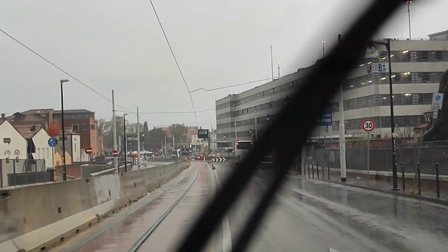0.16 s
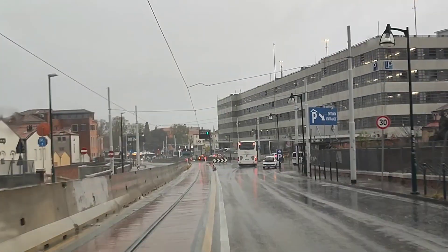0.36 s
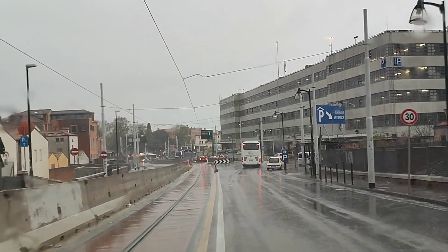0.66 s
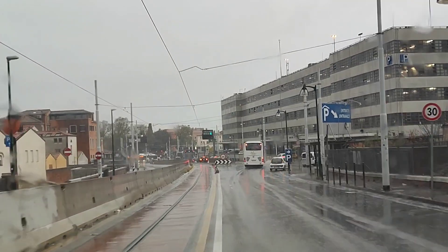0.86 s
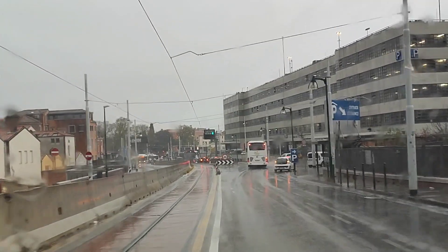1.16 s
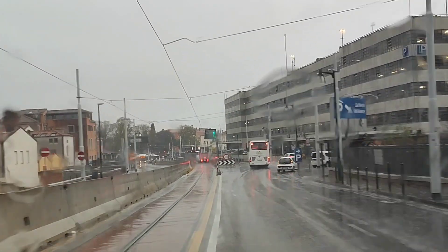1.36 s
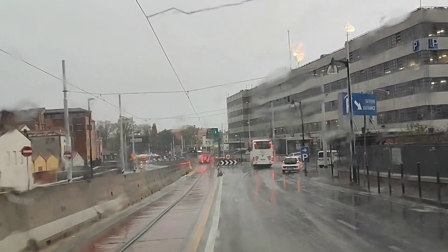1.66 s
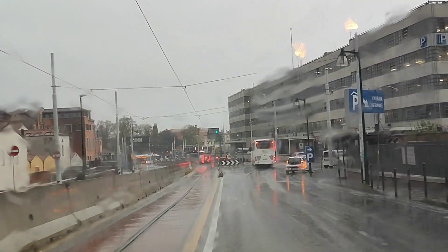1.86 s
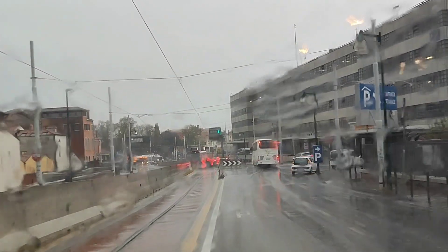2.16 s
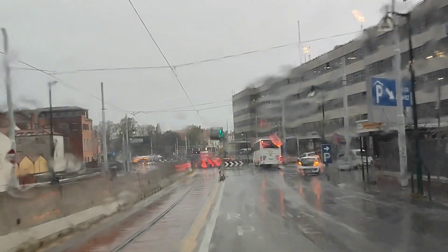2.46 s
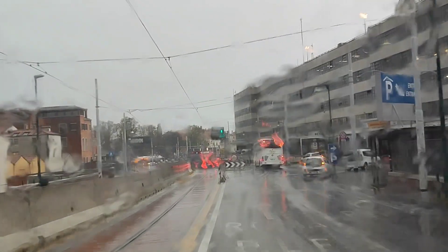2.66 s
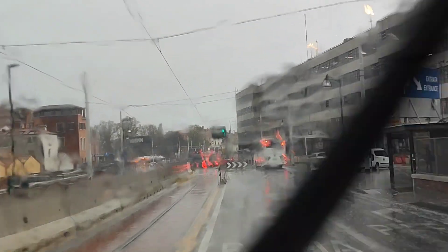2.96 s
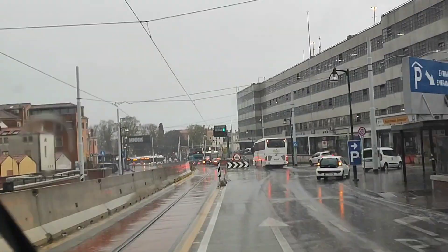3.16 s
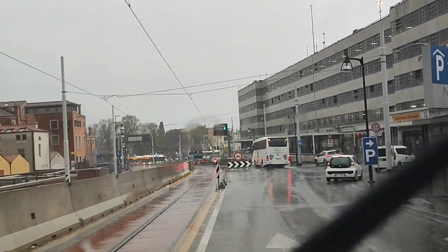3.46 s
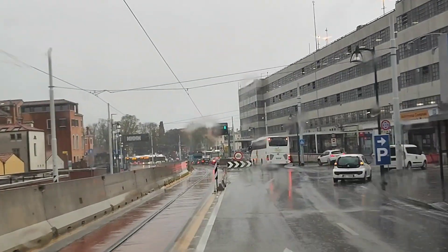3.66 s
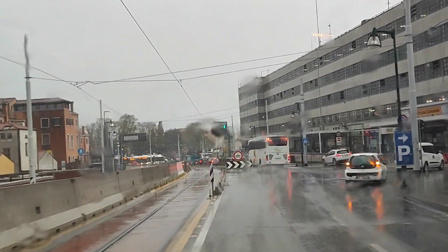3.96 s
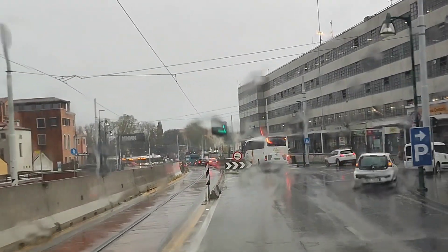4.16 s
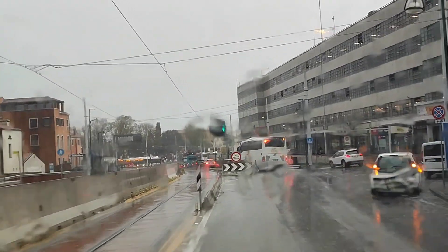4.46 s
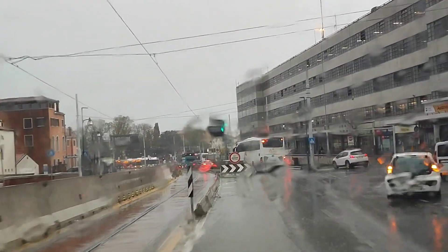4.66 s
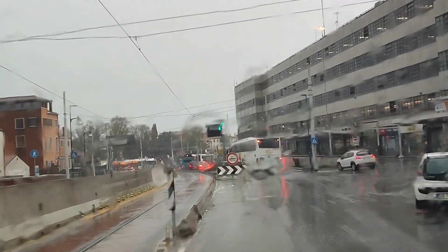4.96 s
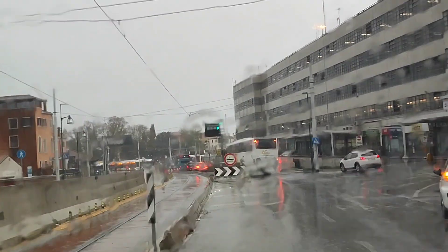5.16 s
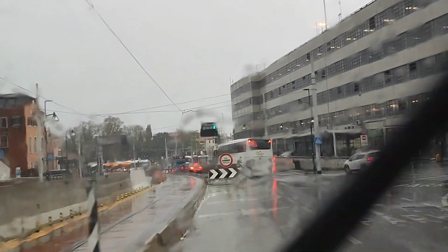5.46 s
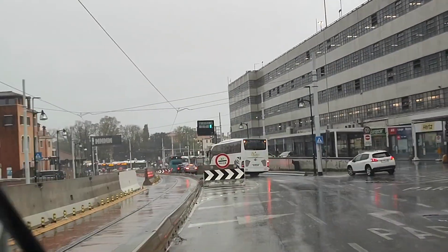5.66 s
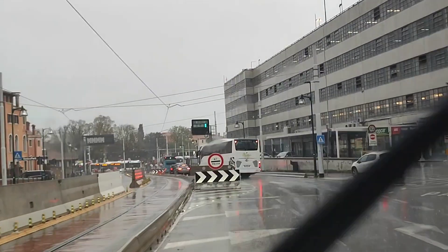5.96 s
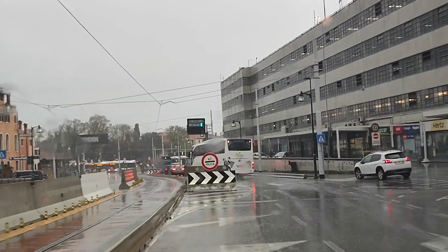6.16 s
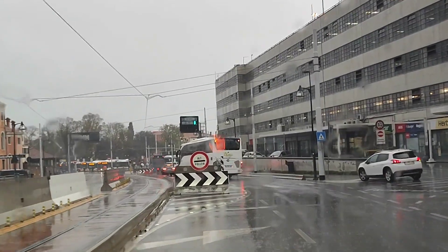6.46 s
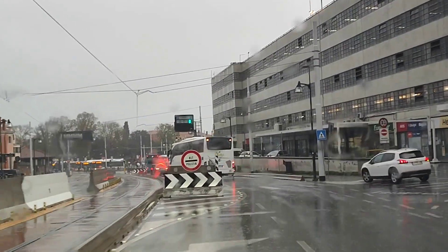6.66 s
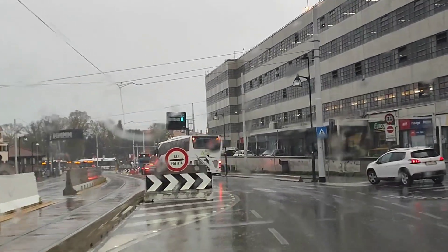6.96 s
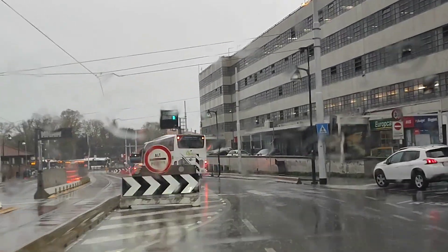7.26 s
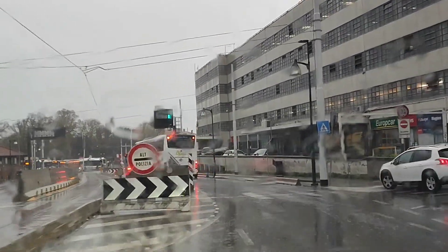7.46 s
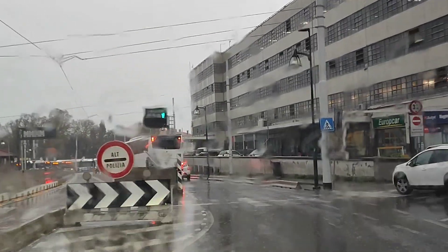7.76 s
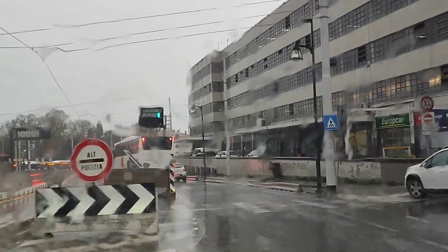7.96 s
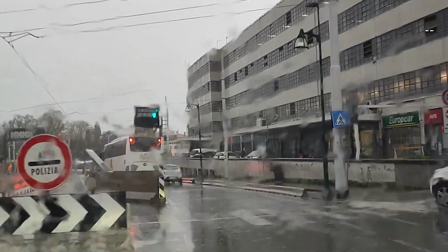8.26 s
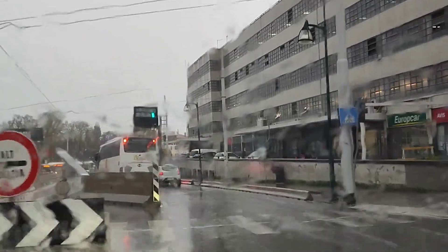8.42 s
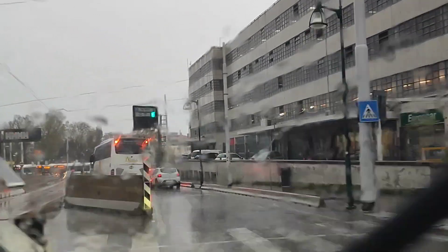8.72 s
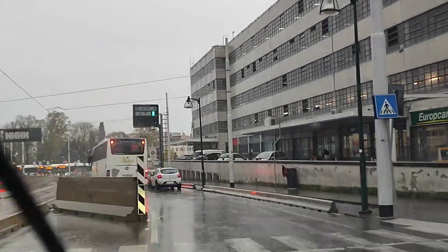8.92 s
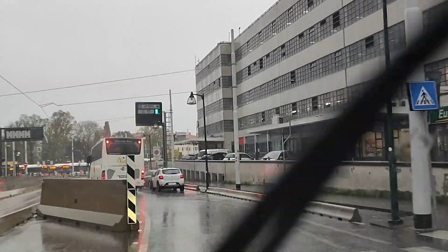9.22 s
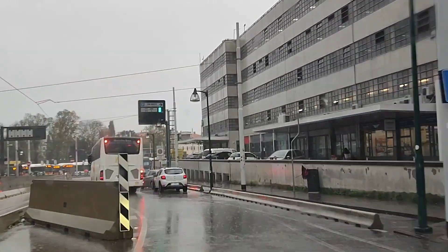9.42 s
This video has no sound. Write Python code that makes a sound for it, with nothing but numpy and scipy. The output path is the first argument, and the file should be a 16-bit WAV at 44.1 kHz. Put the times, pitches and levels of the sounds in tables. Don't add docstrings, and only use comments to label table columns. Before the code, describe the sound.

A close cabin microphone catches rain blown against car glass: a crackling, midrange-bright patter, ringing narrowly around three kilohertz. Strong gusts come early, then a thick burst of hard taps at the left around two and a half to three seconds, another swell just after four, and gentler waves afterwards. Watery spray swishes now and then beneath, tyres and engine barely murmur, and tiny regular ticks tint the texture.

```python
import sys
import numpy as np
from scipy import signal
from scipy.fft import rfft, irfft
from scipy.io import wavfile
from scipy.ndimage import map_coordinates

SR = 44100
rng = np.random.default_rng(int(sys.argv[2]) if len(sys.argv) > 2 else 0)


def amplitude_ratio(level_db):
    exponent = np.asarray(level_db, float) / 20
    return 10 ** exponent


def unload_wav(signal):
    wavfile.write(
        sys.argv[1],
        SR,
        np.round(np.clip(np.atleast_2d(signal).T, -1, 1) * 32767).astype(np.int16),
    )


N = 422919


def rain():
    # frequency in Hz, level in dB per Hz.
    pane_tone = [(900, -50.5), (1400, -22), (2000, -13), (2500, -7), (3050, 2), (3700, -7.5), (4400, -12.5),
                 (5200, -24.5), (7000, -60.5)]
    # frequency in Hz, level in dB per Hz.
    fizz_tone = [(2000, -82), (3500, -34), (4800, 1), (5900, 0.5), (6800, -5.5), (7900, -18.5), (9500, -21),
                 (11000, -31.5), (15500, -42.5)]
    # frequency in Hz, level in dB per Hz.
    spray_tone = [(100, -75), (250, -36.5), (450, -9), (900, -2), (1400, 2.5), (2200, 1.5), (3000, -46),
                  (5000, -84.5)]
    # middle in seconds, spray swell in dB, half length in seconds.
    puddles = [
        (2.144, 1, 0.072),
        (5.594, 3.5, 0.15),
        (6.56, 3.5, 0.21),
        (8.048, 4, 0.25),
        (8.752, 3.5, .06),
    ]
    t = np.arange(N) / SR
    rain_db, pan_db = downpour(t)
    excess_db = rain_db - rain_db.mean()

    fizz_db = -14.5 + 0.36 * excess_db + 0.73 * wobble(9)
    spray_db = -21 - 0.4 * excess_db + 0.65 * wobble(6) + 1.05 * wobble(14)
    for middle, swell_db, half in puddles:
        spray_db = spray_db + swell_db * np.clip(1 - abs(t - middle) / half, 0, 1)

    pan_db = pan_db + 1.6 * wobble(10)
    flurry_db = rain_db + 0.56 * wobble(20) + 0.37 * wobble(45) + np.array([pan_db, -pan_db]) / 2
    near = patter(count=7000, spread_db=3.0, aside_db=5, rarest=0.063)
    far = patter(count=25000, spread_db=2.5, aside_db=4.5, rarest=0.02)
    gusty_db = 0.047 * (rain_db + 38)

    near_thud = unit(bursts(*near, t60=0.011, rise=0.00031)) * amplitude_ratio(-2.5 + gusty_db)
    far_thud = unit(bursts(*far, t60=0.025, rise=0.00034)) * amplitude_ratio(-4.0)
    thud = near_thud + far_thud
    late = 22
    thud[0] += 0.14 * np.roll(thud[1], late)

    near_splash = unit(bursts(*near, t60=0.015, rise=0.0002)) * amplitude_ratio(-4.0 + gusty_db)
    far_splash = unit(bursts(*far, t60=0.017, rise=0.00037)) * amplitude_ratio(-5.5)
    splash = near_splash + far_splash
    spray = amplitude_ratio(0.92 * np.array([wobble(12), wobble(13)])) * rng.standard_normal((2, N))

    pane = coloured(amplitude_ratio(flurry_db + 4.0) * thud, pane_tone)
    fizz = coloured(amplitude_ratio(flurry_db + fizz_db + 2.0) * splash, fizz_tone)
    return pane + fizz + coloured(amplitude_ratio(rain_db + spray_db + 5.0) * spray, spray_tone)


def downpour(t):
    # peak in seconds, swell in dB, rise in seconds, fall in seconds.
    gusts = [(0.17, 8, 0.56, 0.22), (0.49, 13.5, 0.2, 0.78), (1.01, 9.5, 0.16, 0.73),
             (1.391, 2.5, 0.19, 0.05), (1.581, 12, 0.58, 0.88), (1.901, 4.0, 0.21, 0.086),
             (2.21, 6, 0.16, 0.32), (2.58, 11, 0.34, 0.86), (2.69, 5.5, 0.14, 0.062),
             (2.83, 4, 0.058, 0.18), (3.03, 9, 0.16, 0.21), (3.23, 3.5, 0.081, 0.1), (3.42, 9, 0.36, 0.76),
             (3.88, 2, 0.15, 0.039), (4.14, 13, 0.5, 0.8), (4.36, 6, 0.023, 0.15), (4.59, 0.5, 0.1, 0.11),
             (4.89, 2, 0.06, 0.79), (5.42, 1.5, 0.056, 0.15), (5.571, 10.5, 0.39, 0.58),
             (6.09, 9, 0.17, 0.17), (6.32, 10.5, 0.19, 0.41), (7.07, 6.5, 0.28, 0.15),
             (7.59, 11.0, 0.65, 0.51), (8.19, 8.0, 0.33, 0.56), (8.78, 6, 0.21, 0.09), (9.25, 8, 0.67, 1),
             (9.55, 2.5, 0.24, 0.073)]
    # time in seconds, left over right in dB.
    slant = [
        (0.0, 0),
        (2.4, 1.5),
        (2.6, 4.5),
        (3.7, 0.5),
        (4.35, 4),
        (4.6, 2),
        (9.59, 0.5),
    ]
    rain_db = -50
    for peak, swell_db, rise, fall in gusts:
        times = [peak - abs(rise), peak, peak + abs(fall)]
        rain_db = rain_db + swell_db * np.interp(t, times, [0, 1, 0])
    return rain_db, np.interp(t, *np.transpose(slant))


def patter(count, spread_db, aside_db, rarest):
    draw = rng.random((count, 3))
    size_db = -spread_db * np.log(draw[:, 1] + rarest)
    pan_db = aside_db * (2 * draw[:, 2] - 1)
    return draw[:, 0] * N / SR, amplitude_ratio([size_db + pan_db, size_db - pan_db])


def bursts(s, sizes, t60, rise):
    at = np.clip(np.round(s * SR).astype(int), 0, N - 1)
    power = np.array([np.bincount(at, size ** 2, N) for size in sizes])
    fading = signal.lfilter([1], [1, -amplitude_ratio(-120 / (t60 * SR))], power)
    swell = np.exp(-1 / (abs(rise) * SR + 1e-3))
    power = signal.lfilter([1 - swell], [1, -swell], fading)
    return np.sqrt(power) * rng.standard_normal((2, N))


def drops():
    # frequency in Hz, level in dB per Hz.
    knock_tone = [(1200, -59), (1900, -23), (2500, -7), (3100, 1.5), (3800, -5.5), (4600, -11),
                  (5500, -24.5), (7000, -60)]
    # frequency in Hz, level in dB per Hz.
    splash_tone = [(2500, -60.5), (4000, -8), (5000, -1.5), (6000, 1), (7000, -10), (8500, -18.5),
                   (11000, -35.5), (15500, -51)]
    # peak in seconds, left level in dB, right level in dB,
    # splash over knock in dB.
    left_drops = [(2.3746, -13, -28, -23), (2.4806, -18.5, -31, -27), (2.5076, -17, -30, -7),
                  (2.5249, -13, -15, -15), (2.5617, -10, -21, -10.5), (2.5792, -9.5, -23.0, -17),
                  (2.5915, -7.5, -19.5, -11), (2.6492, -12.5, -31, -9), (2.6771, -6.5, -20, -20),
                  (2.8098, -14.5, -28, -15), (2.829, -17, -28.0, -13), (2.8409, -16, -29.5, -23),
                  (2.8476, -12.5, -32, -16), (2.9525, -12.5, -26.0, -23), (2.9598, -13, -17, -15),
                  (2.9967, -10, -21, -9), (3.0173, -15, -24.5, -21), (3.0392, -27, -20, -20),
                  (3.0517, -15, -24.5, -16), (3.1221, -14, -26.5, -19), (3.7812, -17.5, -31, -25),
                  (4.1392, -14, -26.5, -16), (4.1569, -13, -25.5, -10), (4.2115, -17, -26.0, -10),
                  (4.3668, -19, -23, -10), (5.4173, -19, -32.5, -19), (5.7244, -18.5, -33, -13),
                  (6.4716, -15.5, -35.0, -17), (7.1753, -23, -26, -26), (8.2269, -20, -31, -25)]
    # peak in seconds, left level in dB,
    # right level in dB, splash over knock in dB.
    other_drops = [(0.437, -16, -16.5, -15), (0.505, -16, -13, -22), (0.5172, -18, -26, -7.5),
                   (0.566, -14, -26, -18), (0.6474, -13, -12, -18), (0.791, -19.5, -22, -16),
                   (0.891, -20, -16.5, -14), (0.987, -30, -22, -14), (1.0442, -24, -23, -5),
                   (1.1754, -19, -20, -19), (1.638, -35, -23, -9), (1.8002, -21.0, -21, -18),
                   (1.806, -25.5, -20.0, -18), (1.9372, -22, -19, -22), (2.0901, -19, -21, -15),
                   (2.1029, -36, -24.0, -25), (2.1257, -37, -22.0, -24), (2.151, -20, -18, -28),
                   (3.6984, -26, -22, -19), (4.0187, -13, -22, -17), (4.8478, -41, -28, -25),
                   (5.5621, -30.5, -20, -17), (6.2988, -25, -22, -15), (6.867, -33.5, -25, -25.5),
                   (6.9071, -30.5, -26, -24), (6.9653, -31, -22, -23), (7.4656, -26, -27, -12),
                   (7.8057, -25, -25, -13), (8.7655, -22, -20, -11), (8.85, -24.5, -26, -28)]
    rows = np.vstack([left_drops, other_drops, smalls(), strays(count=70)])
    s, left_db, right_db, splash_db = rows.T
    side_db = np.array([left_db, right_db])
    knock = landed(s, side_db - 2.5, knock_tone, t60=0.008, smear_db=-14)
    return knock + landed(s, side_db + splash_db - 2.0, splash_tone, t60=0.006, smear_db=-10.5)


def smalls():
    # first touch in seconds, peak level in dB, left over right in dB, splash over knock in dB.
    small_drops = [(0.1401, -28, 1.0, -18), (0.4579, -26, 2.0, -16), (0.5896, -24, 1.0, -12),
                   (1.2144, -28, 1.0, -17), (1.2745, -22, 1.5, -14), (1.3144, -21, 2, -15),
                   (1.8454, -27, -4, -16), (2.3154, -25, 2, -11), (2.6239, -22, 8, -11),
                   (2.6474, -26, 6, -14), (3.0764, -24, 6, -16), (3.2804, -28, 3.0, -11),
                   (3.4754, -30.5, 6, -16), (4.1034, -26, 4.0, -18), (4.3365, -25, 8, -19),
                   (4.6588, -30, 4, -15), (4.9033, -33, -3, -18), (5.6605, -28, 10, -18),
                   (5.8024, -28, 4, -10), (5.9529, -30, 9, -16), (7.2873, -31, -1.0, -16),
                   (7.5063, -26, -1.5, -19), (7.5857, -24, 3.5, -20), (7.6004, -25, -1, -20),
                   (7.66, -25.5, 5, -19), (8.0112, -29.5, 1, -21), (8.081, -32.5, -2, -17.5),
                   (8.1748, -28.5, 2, -16), (9.1331, -28, 8, -13), (9.1674, -26, 0.5, -18)]
    s, peak_db, pan_db, splash_db = np.transpose(small_drops)
    peak_s = s + 0.000993
    side_db = peak_db + 4.5
    return np.transpose([peak_s, side_db + pan_db / 2, side_db - pan_db / 2, splash_db])


def strays(count):
    when, size, aside, wet = rng.random((count, 4)).T
    s = when * N / SR
    rain_db, pan_db = downpour(s)
    growth_db = 0.43 * (rain_db + 41)
    peak_db = rain_db + growth_db + 14 - 2.5 * np.log(size + 0.13)
    lean_db = pan_db + 3.5 * (2 * aside - 1)
    splash_db = -15 + 6 * (2 * wet - 1)
    return np.transpose([s, peak_db + lean_db, peak_db - lean_db, splash_db])


def landed(s, peak_db, spectrum, t60, smear_db):
    t = np.arange(1200) / SR
    blow = amplitude_ratio(-60 * t / t60) * (1 - np.exp(-t / 0.0004))
    cabin_smear = amplitude_ratio(smear_db - 60 * t / 0.045)
    noise = rng.standard_normal((2 * len(s), len(t)))
    puffs = coloured((blow + cabin_smear) * noise, spectrum)
    puffs = puffs.reshape(len(s), 2, -1)[..., :len(t)]
    puffs = puffs / abs(puffs).max(2, keepdims=True) * amplitude_ratio(peak_db.T)[..., None]
    start = np.round(s * SR).astype(int)[:, None] - abs(puffs).argmax(2)
    at = np.clip(start[..., None] + np.arange(len(t)), 0, N)
    sides = [np.bincount(at[:, side].ravel(), puffs[:, side].ravel(), N + 1)[:N] for side in range(2)]
    return np.array(sides)


def road():
    # frequency in Hz, level in dB per Hz.
    rumble_tone = [(25, -57), (75, -31), (130, -9), (160, -14), (230, -1.5), (400, 1), (800, -1.5),
                   (1500, -23), (3000, -82.5)]
    # frequency in Hz, likeness (1 is identical).
    likeness = [(60, .8), (130, 1), (290, 0.97), (640, 0.11)]
    alike = along(likeness, np.fft.rfftfreq(N, 1 / SR))
    turn = np.arccos(np.clip(alike, -1, 1)) / 2
    rumble = coloured(rng.standard_normal((2, N)), rumble_tone)
    mid, side = irfft(rfft(rumble) * [np.cos(turn), np.sin(turn)], N)
    level = amplitude_ratio(-72 + 0.65 * wobble(2.8) + 0.46 * wobble(9))
    return level * np.array([mid + side, mid - side]) * amplitude_ratio([[0.8], [-0.8]])


def coloured(x, spectrum):
    size = 4096
    gain = amplitude_ratio(along(spectrum, np.fft.rfftfreq(size, 1 / SR)))
    forward = np.r_[1, np.full(size // 2 - 1, 2), 1, np.zeros(size // 2 - 1)]
    fold = irfft(np.log(gain + 1e-6)) * forward
    ring = irfft(np.exp(rfft(fold)))
    return signal.oaconvolve(x, ring[None] / np.linalg.norm(ring), axes=1)[:, :N]


def along(points, hz):
    f, v = np.transpose(points)
    return np.interp(np.log(hz + 1), np.log(f + 1), v)


def wobble(rate):
    knots = rng.standard_normal(int(N * rate / SR) + 4)
    return map_coordinates(knots, [np.arange(N) * rate / SR])


def unit(x):
    return x / np.sqrt(np.mean(x ** 2) + 1e-20)


def scene():
    return rain() + drops() + road()


def buffer_ticks(hz, t60, db):
    buffer, edge = 1024, 857
    shared, left, right = rng.standard_normal((3, N // buffer))
    jumps = np.zeros((2, N))
    jumps[:, edge::buffer][:, :len(shared)] = 0.92 * shared + 0.69 * np.array([left, right])
    t = np.arange(256) / SR
    ring = amplitude_ratio(db - 60 * t / t60) * np.cos(2 * np.pi * hz * t - 0.25)
    return signal.oaconvolve(jumps, ring[None], axes=1)[:, :N]


def low_pass(x):
    return signal.sosfilt(signal.butter(12, 16530, fs=SR, output="sos"), x)


def record(dry):
    padded = N + 4096
    hz = np.fft.rfftfreq(padded, 1 / SR)
    passed = (hz < 15830) / (1 + (110 / (hz + 1)) ** 3)
    hiss = amplitude_ratio(-91) * rng.standard_normal((2, N))
    wired = dry + buffer_ticks(hz=2740, t60=0.0057, db=-43.0) + hiss
    mix = irfft(rfft(wired, padded) * passed, padded)[:, :N]
    return low_pass(mix)


dry = scene()
out = record(dry)
unload_wav(out)
```